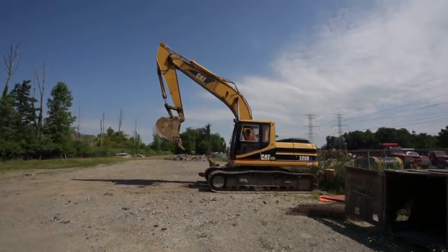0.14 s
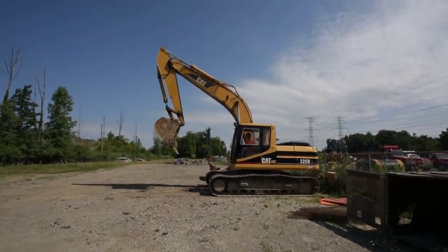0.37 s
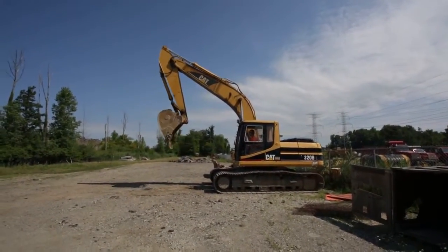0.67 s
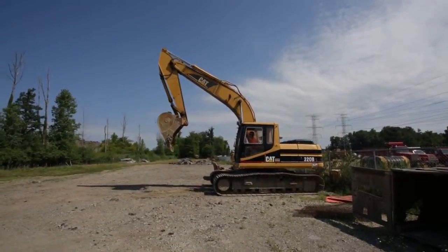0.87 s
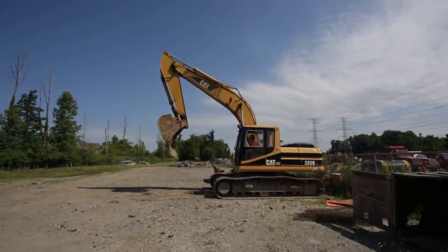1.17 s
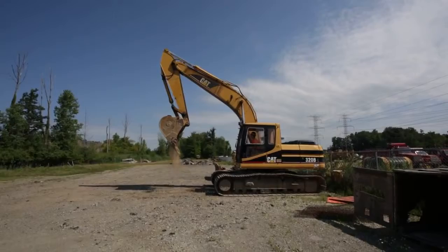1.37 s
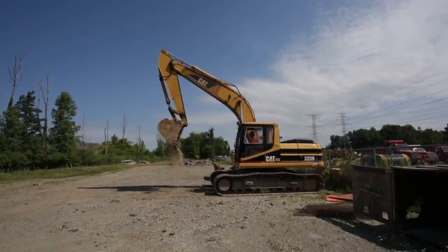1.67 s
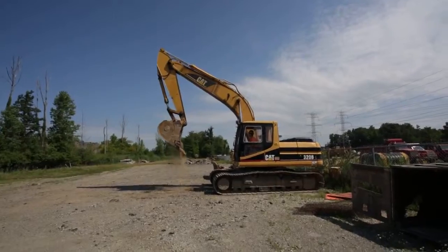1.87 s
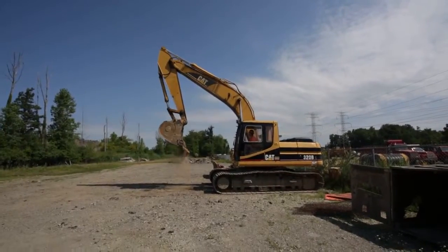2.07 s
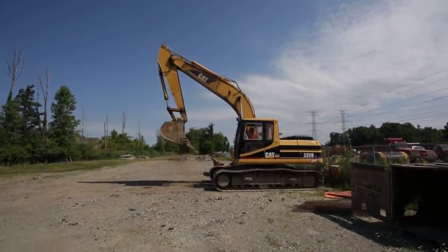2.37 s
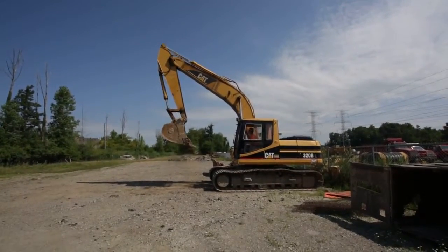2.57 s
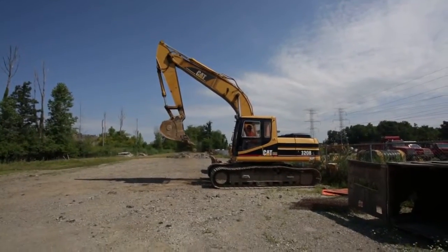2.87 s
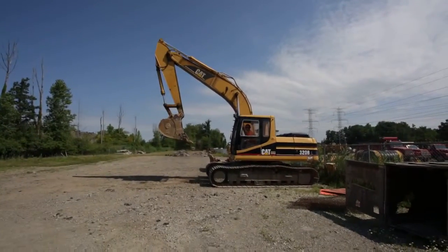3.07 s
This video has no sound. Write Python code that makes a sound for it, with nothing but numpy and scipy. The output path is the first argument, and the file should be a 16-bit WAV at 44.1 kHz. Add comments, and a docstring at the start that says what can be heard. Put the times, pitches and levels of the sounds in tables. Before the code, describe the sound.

A diesel excavator drones with a thin whine while its steel bucket clanks repeatedly outdoors.

```python
"""A six-cylinder diesel excavator drones on an open gravel lot, its cover booming and its block clattering.
Oil hisses as filtered noise, and a thin high whine wanders in pitch; the engine sags under hydraulic load.
Then bursts of noise and ringing tones make the bucket clank again and again as it is shaken out.
Among the blows the bucket pin scrapes briefly, a loose link clinks, and soil pours out as grainy noise.
The engine drones on to the end, with a few late blows of the bucket."""
import sys
import numpy as np
from scipy import signal
from scipy.fft import rfft, irfft
from scipy.io import wavfile
from scipy.ndimage import uniform_filter1d

SR = 44100
rng = np.random.default_rng(int(sys.argv[2]) if len(sys.argv) > 2 else 0)


def wav_out(sig):
    """Save sig, one row per channel (or a flat mono array), as 16-bit PCM at SR to the path in sys.argv[1]."""
    wavfile.write(sys.argv[1], SR, np.round(np.clip(np.atleast_2d(sig).T, -1, 1) * 32767).astype(np.int16))


N = 142443
T = np.arange(N) / SR  # time (s)

# Level of the machinery over time: start_s, block_clatter_db, oil_hiss_db
MACHINE_LEVELS = [(0, -27, -36.5), (.45, -27, -34), (.82, -25, -31), (1.1, -24.5, -29.5),
                  (1.38, -26, -41.5), (1.75, -30, -41.5), (1.95, -31, -37.5), (2.1, -27.5, -37),
                  (2.7, -28.5, -35), (3.23, -25, -36)]


def undb(db):
    """Turn decibels into a gain."""
    return 10 ** (np.asarray(db) / 20)


def unit(x):
    """Scale a sound to an rms (average strength) of 1."""
    return x / np.sqrt(np.mean(x ** 2))


def curve(table, column):
    """Join one column of a table by straight lines in time."""
    table = np.array(table)
    return np.interp(T, table[:, 0], table[:, column])


def colour(x, points):
    """Shape the spectrum of x by points of (pitch_hz, level_db), then scale it to rms 1."""
    hz, db = np.array(points).T
    f = np.maximum(np.fft.rfftfreq(N, 1 / SR), 1)
    gain = undb(np.interp(np.log(f), np.log(hz), db))
    return unit(irfft(rfft(x) * gain, N))


def walk(rate):
    """Smooth random motion of rms 1, with about `rate` fresh random values a second."""
    k = max(int(SR / rate), 1)
    steps = np.repeat(rng.standard_normal(N // k + 1), k)
    smooth = uniform_filter1d(uniform_filter1d(steps, k), k)
    return unit(smooth[:N])


def noise():
    """White noise."""
    return rng.standard_normal(N)


def decay(t60, start=0):
    """Envelope that begins at start and falls 60 dB in t60 seconds."""
    return undb(-60 * np.maximum(T - start, 0) / t60) * (T >= start)


def ring(x, response):
    """Let x set off a response scaled to unit energy (convolution)."""
    return signal.fftconvolve(x, response / np.linalg.norm(response))[:N]


def even(x, size=441):
    """Hold the short-term level of a grainy noise at rms 1, over a window of size samples."""
    return x / np.sqrt(uniform_filter1d(x ** 2, size))


def drone(turns, rough_hz=45, lope=0.088):
    """Exhaust tones at multiples of crank speed swell together once a turn, strong and weak by turns."""
    # Exhaust levels over time, added to the order levels: start_s, firing_db, octave_db, other_orders_db
    exhaust_levels = [(0, 1, 2.5, -1), (.45, 0, 1, -1.5), (.84, -5.5, -2, -1.5), (.9, -16, -28, -8),
                      (1.03, -38.5, -20, -23), (1.12, -7.5, -9.5, -10.5), (1.4, -8, -4, -8),
                      (1.72, -5.5, -1, -8.5), (1.92, -3, -2, -6), (2.08, -0.5, 1, -1), (2.45, 1, 0, -2),
                      (3.23, 0.5, 3, -1)]
    # Exhaust and pump tones: order (multiple of crank speed), relative_level_db
    orders = [(3, -4), (4.5, -13.5), (6, -0.5), (7, -3), (8, -1.5), (9, -8), (10, -13.5), (11, -14),
              (12, -13.5), (13, -20.5), (16, -18), (21, -18.5), (24, -37), (25, -26), (31, -27),
              (41, -21.5)]
    # Spectrum of the low rumble: pitch_hz, relative_level_db per Hz
    rumble_spectrum = [(20, -39.5), (45, -44), (70, -34.5), (120, 7), (190, 12), (250, 15), (350, 7),
                       (600, -20)]
    drone_db, rumble_db = -21, -32.5
    flutter_per_order = 0.0209  # higher orders flutter more
    # the muffler smears each throb around this order (radians per order squared)
    muffler_order, muffler_smear = 7, .72

    firing, octave, rest = (undb(curve(exhaust_levels, k)) for k in range(1, 4))
    tones = 0
    for order, db in orders:
        # three cylinders fire in each turn
        is_firing, is_octave = order == 3, order == 6
        gain = firing if is_firing else octave if is_octave else rest
        phase = 2 * np.pi * order * turns + muffler_smear * (order - muffler_order) ** 2
        flutter = flutter_per_order * order
        wobble = 1 + flutter * (walk(rough_hz) + 1j * walk(rough_hz))
        # the division keeps the average power the same whatever the flutter
        wave = np.exp(1j * phase) * wobble / np.sqrt(1 + 2 * flutter ** 2)
        uneven = 1 if is_firing else 1 + lope * np.cos(np.pi * turns)
        tones = tones + np.sqrt(2) * undb(db + drone_db) * gain * uneven * wave.real
    return tones + undb(rumble_db) * rest * colour(noise(), rumble_spectrum)


def hood(hz=318, width_hz=65, db=-35):
    """The engine cover booms in one broad resonance, whatever the load."""
    band = signal.butter(2, [hz - width_hz / 2, hz + width_hz / 2], "band", fs=SR, output="sos")
    return undb(db) * unit(signal.sosfilt(band, noise()))


def clatter(turns, knock=0.11, repeat_share=0.11, unrest_db=0.87, size=1536, count=3):
    """Injectors and gears knock at each firing; part of the noise pattern comes back on every turn."""
    # Spectrum of the engine block: pitch_hz, relative_level_db per Hz
    block_spectrum = [(300, -2.5), (430, -0.5), (530, -7.5), (690, 4), (960, -5.5), (1150, -2), (1340, -12),
                      (1650, -5), (2000, -14), (2400, -12), (4000, -53), (9000, -53.5)]
    pattern = np.interp(turns % 1 * size, np.arange(size), rng.standard_normal(size))
    # repeat_share is a share of the power, hence the square roots
    drive = np.sqrt(repeat_share) * unit(pattern) + np.sqrt(1 - repeat_share) * noise()
    knocking = 1 + knock * np.cos(2 * np.pi * count * turns)
    level = undb(curve(MACHINE_LEVELS, 1) + unrest_db * walk(34.89))
    return level * colour(drive * knocking, block_spectrum)


def hydraulics(turns, ripple=0.14, flicker_db=1.42, count=3):
    """Oil hisses through valves and hoses, pulsing slightly with the engine."""
    # Spectrum of the hiss: pitch_hz, relative_level_db per Hz
    oil_spectrum = [(900, 3), (2000, -1.5), (3100, 1.5), (4000, 0), (5500, 1), (7000, 1.5), (8000, -2),
                    (8900, -2), (10500, -8.5), (13000, -16.5), (15500, -30)]
    # Resonances of hoses and valves: pitch_hz, width_hz, relative_level_db
    oil_resonances = [(2883.5, 70, 0.5), (3508.9, 77, 1.5), (4670, 153.9, 2.5), (5452, 65, -26)]
    resonance_db = -8  # against the plain hiss
    rings = 0
    for hz, width_hz, db in oil_resonances:
        peak = signal.iirpeak(hz, hz / width_hz, fs=SR)
        rings = rings + undb(db) * unit(signal.lfilter(*peak, noise()))
    hiss = colour(noise(), oil_spectrum) + undb(resonance_db) * unit(rings)
    level = undb(curve(MACHINE_LEVELS, 2) + flicker_db * walk(60.311))
    return hiss * level * (1 + ripple * np.cos(2 * np.pi * count * turns))


def panels(x, count=40):
    """Close reflections between cab, boom and ground colour the machinery noise."""
    spread_s, reflections_db = .035, -9
    lag, sign = rng.random((2, count))
    delays = (lag * spread_s * SR).astype(int) + 1  # in samples
    echoes = np.bincount(delays, np.sign(sign - .5))
    # the division makes up for the power that the echoes add
    return (x + undb(reflections_db) * ring(x, echoes)) / np.hypot(1, undb(reflections_db))


def whine(turns, ripple=0.4, count=6):
    """A narrow, breathy whistle flutters with the engine, probably the turbocharger."""
    # Path of the whistle: start_s, pitch_hz, level_db (before the flutter)
    whistle_path = [(0, 13600, -50), (.2, 12850, -48), (.45, 12500, -48.5), (.8, 13150, -48),
                    (1.0, 13500, -64), (1.1, 15000, -59), (1.33, 13750, -58), (1.55, 12900, -57),
                    (1.9, 11990, -49.5), (2.4, 11880, -46), (2.95, 11870, -48.5), (3.23, 11610, -49.5)]
    half_width_hz = 230  # the blur reaches this far to each side of the pitch
    low_pass = signal.butter(2, half_width_hz, fs=SR, output="sos")
    blur = signal.sosfilt(low_pass, noise() + 1j * noise())
    turning = np.exp(2j * np.pi * np.cumsum(curve(whistle_path, 1)) / SR)
    whistle = unit((blur * turning).real)
    flutter = 1 + ripple * np.cos(2 * np.pi * count * turns)
    return whistle * flutter * undb(curve(whistle_path, 2))


def bucket():
    """Each blow is a burst of chattering contacts that cracks, knocks and sets the steel ringing."""
    # Blows: start_s, relative_level_db, treble_db (added to the level), chatter_s (60 dB fall), knock_hz
    blows = [(0.843, -13.5, -11.5, 0.041, 1330), (0.851, -11.5, 7.5, 0.023, 735),
             (.867, -13.5, -7, 0.058, 530), (.883, -26.5, -3, 0.071, 540), (.918, -20.5, -2.5, 0.098, 705),
             (.984, -15.5, -4, 0.074, 756), (1.011, -16.5, 1.5, 0.031, 766),
             (1.076, -14.5, -15, 0.079, 650), (1.098, -18, -3.5, 0.097, 1054),
             (1.137, -21, -8.5, 0.066, 844), (1.216, -17.5, 4.5, 0.093, 787.5),
             (1.276, -22.5, -0.5, 0.066, 340), (1.311, -21, -4, 0.045, 335), (1.396, -29, -1, 0.0917, 740),
             (1.507, -13, -6, 0.064, 265), (1.544, -16.5, 1.5, 0.079, 238.6),
             (1.574, -24, -20, 0.0477, 786), (2.029, -23.5, -6.5, 0.1, 347), (2.086, -29, -1, 0.083, 690),
             (3.141, -20.5, -5, 0.058, 1162), (3.174, -16.5, -20.5, 0.0081, 590)]
    # Long ringing tones of the bucket: pitch_hz, relative_level_db
    bucket_tones = [(234, -3), (286, -3), (319, -1), (527, -5), (566, -2), (701, 0), (819, -3), (1015, -3),
                    (1147, -3), (1255, -4), (1524, -6), (2095, -12), (2905, -7), (3535, -6)]
    # Spectra of the bare contacts, dull body and bright crash: pitch_hz, relative_level_db per Hz
    crack_spectrum = [(900, -3), (2000, -1), (4800, -5), (6400, 2.5), (8500, -6), (10500, -17),
                      (15500, -26)]
    body_spectrum = [(90, -26), (170, 6.5), (330, 5), (480, -2.5), (750, 5), (1200, 0), (1700, -1.5),
                     (2400, -8.5), (4000, -12), (9000, -46)]
    crash_spectrum = [(900, -28), (2000, -1), (3500, 3), (4800, -0.5), (6800, 1.5), (8500, -6),
                      (10500, -18.5), (15500, -29)]
    rise_share = 0.12  # part of the chatter that it takes to build up
    contact_db, crack_db, knock_db, ring_db, crash_db, tail_db = 9.5, -7, 0.5, -8.5, -5.5, -19
    # times to fall 60 dB (s)
    knock_t60, body_t60, crash_t60, tail_t60, ring_t60 = 0.098, 0.3123, 0.2, 0.55, .65
    ring_damping = .5  # how strongly the ring time depends on pitch
    rattle_per_s, rattle_scatter_db = 1100, 5

    # powers of overlapping blows add up
    force = bright = knocks = 0
    for start, db, treble_db, length, knock_hz in blows:
        onset = undb(db) * np.clip((T - start) / (rise_share * length), 0, 1)
        contact = (onset * decay(length, start)) ** 2
        force = force + contact
        bright = bright + contact * undb(treble_db) ** 2
        knock = np.sin(2 * np.pi * knock_hz * (T - start))
        knocks = knocks + onset * decay(knock_t60, start) * knock

    grains = noise() * undb(rattle_scatter_db * walk(rattle_per_s))
    chatter = undb(contact_db) * even(grains)
    push = chatter * np.sqrt(force)
    bright_push = chatter * np.sqrt(bright)

    tail = undb(tail_db) * decay(tail_t60)
    body = colour(noise(), body_spectrum) * (decay(body_t60) + tail)
    crash = colour(noise(), crash_spectrum) * (decay(crash_t60) + tail)
    # colour() resets the level, so the contact gain is given again
    crack = undb(crack_db + contact_db) * colour(chatter, crack_spectrum) * np.sqrt(bright)

    tones = 0
    for k, (hz, db) in enumerate(bucket_tones):
        # the ring time holds at 700 Hz; higher tones die sooner
        fall = decay(ring_t60 * (700 / hz) ** ring_damping)
        tones = tones + undb(db) * fall * np.sin(2 * np.pi * hz * T) * (-1) ** k

    steel = ring(push, body) + undb(ring_db) * ring(push, tones)
    steel = steel + undb(crash_db) * ring(bright_push, crash)
    return steel + crack + undb(knock_db) * knocks * (1 + 0.49 * walk(150))


def scrape():
    """The bucket pin rubs in its bush: one narrow resonance whose pitch falls as the pin slows."""
    centre_s, spread_s, level_db = 1.113, .014, -23
    pitch_hz, sag_per_s = 1090, 4  # the pitch at the centre, and its rate of fall
    blur_per_s = 60  # random values a second that roughen the tone
    hz = pitch_hz * np.exp(-sag_per_s * (T - centre_s))
    rub = walk(blur_per_s) + 1j * walk(blur_per_s)
    swell = np.exp(-((T - centre_s) / spread_s) ** 2 / 2)
    return undb(level_db) * swell * (rub * np.exp(2j * np.pi * np.cumsum(hz) / SR)).real


def link():
    """The loose steel link strikes its pin and rings in separate tones, a little differently each time."""
    # Strikes: start_s, relative_level_db
    strikes = [(1.221, -28), (3.142, -23), (3.174, -26)]
    # Ringing tones of the link: pitch_hz, relative_level_db (before the scatter)
    link_tones = [(1455, 0), (1510, 0), (2030, -7), (2220, -9), (2315, -4), (2525, -6), (2890, -4),
                  (3190, -11), (3480, -7)]
    t60_s, rise_s, scatter_db = .2, .003, 2
    hz, tone_db = np.array(link_tones).T
    out = 0
    for start, db in strikes:
        sizes = undb(db + tone_db + scatter_db * rng.standard_normal(len(hz)))
        partials = sum(size * np.sin(2 * np.pi * (f * T + rng.random())) for f, size in zip(hz, sizes))
        out = out + partials * np.clip((T - start) / rise_s, 0, 1) * decay(t60_s, start)
    return out


def soil(grain_db=4):
    """Earth and small stones slide from the bucket and patter on the gravel, as one swell of grainy noise."""
    # Spectrum of the pouring soil: pitch_hz, relative_level_db per Hz
    soil_spectrum = [(150, -3), (350, -9), (900, -6), (1800, -10), (3500, -18.5), (8000, -34), (15000, -45)]
    peak_s, rise_s, fall_s, level_db = 1.485, 0.061, 0.058, -23
    spread = np.where(T < peak_s, rise_s, fall_s)
    swell = np.exp(-((T - peak_s) / spread) ** 2 / 2)
    grains = even(noise() * undb(grain_db * walk(900)))
    return undb(level_db) * swell * colour(grains, soil_spectrum)


def scene():
    """The crankshaft's turning paces the engine and oil sounds; the bucket works over them."""
    # Crankshaft speed before a slight random jitter: start_s, turns_per_s
    crank_speed = [(0, 28), (.2, 28.5), (.42, 28.2), (.65, 26.8), (.87, 28.5), (1.08, 26.491), (1.3, 29.17),
                   (1.8, 28.15), (2.05, 28.72), (2.65, 28.8), (2.86, 28.4), (3.04, 28.7), (3.23, 29.4)]
    jitter = 0.0030315  # share of the speed
    speed = curve(crank_speed, 1) * (1 + jitter * walk(14))
    turns = np.cumsum(speed) / SR
    engine = drone(turns) + hood()
    machinery = panels(clatter(turns) + hydraulics(turns))
    mix = engine + machinery + whine(turns) + bucket() + scrape() + link() + soil()
    return mix[None]


def record(dry):
    """Thin the deep bass, clip at full scale and cut the top of the treble."""
    low_cut_hz, top_hz = 68, 15700
    high_pass = signal.butter(4, low_cut_hz, "high", fs=SR, output="sos")
    thin = signal.sosfilt(high_pass, dry)
    low_pass = signal.ellip(10, .2, 80, top_hz, fs=SR, output="sos")
    return signal.sosfilt(low_pass, np.clip(thin, -1, 1))


dry = scene()
out = record(dry)
wav_out(out)
```